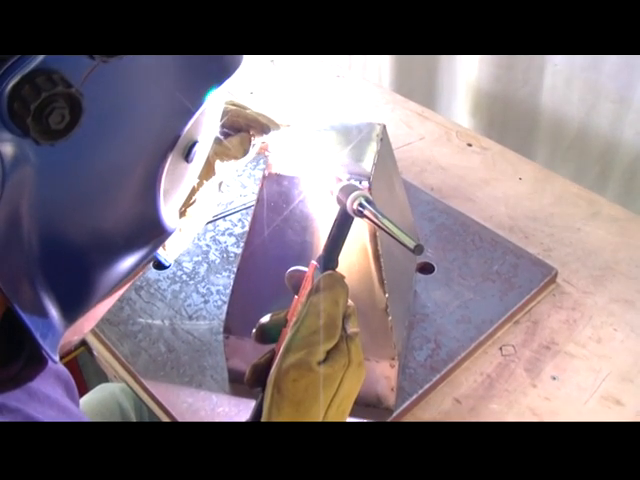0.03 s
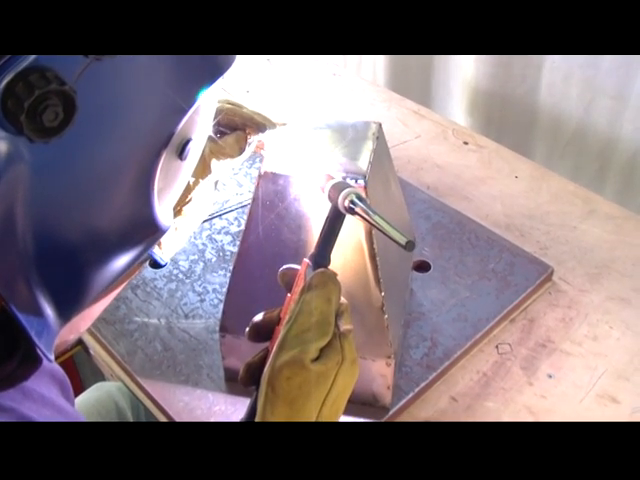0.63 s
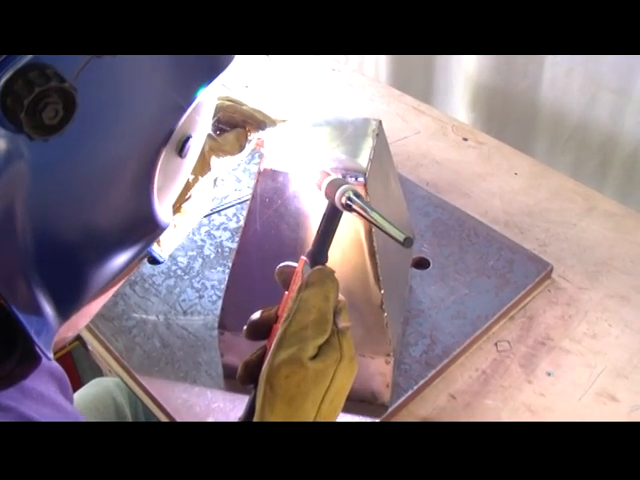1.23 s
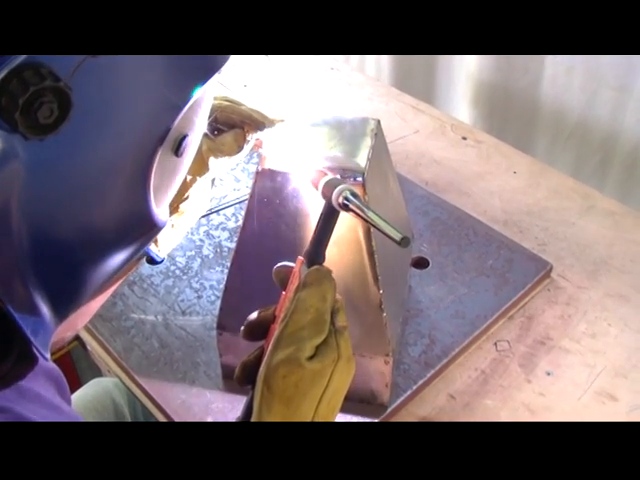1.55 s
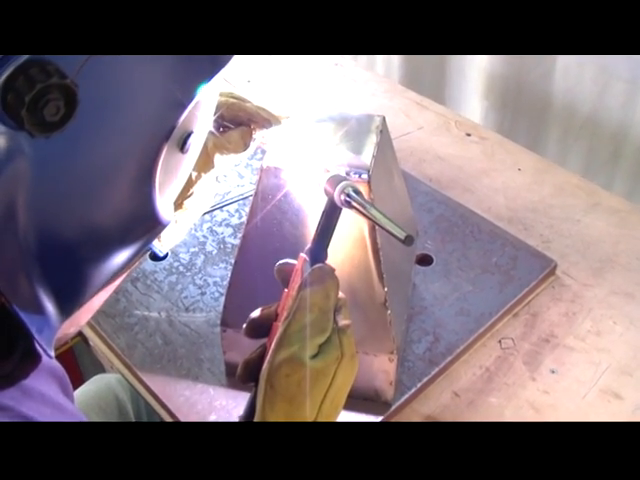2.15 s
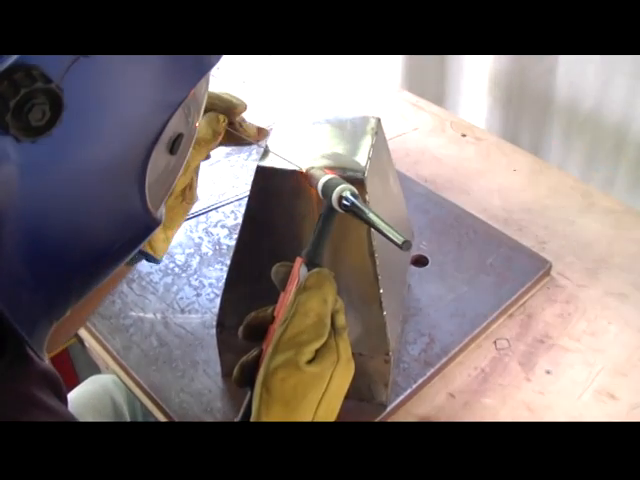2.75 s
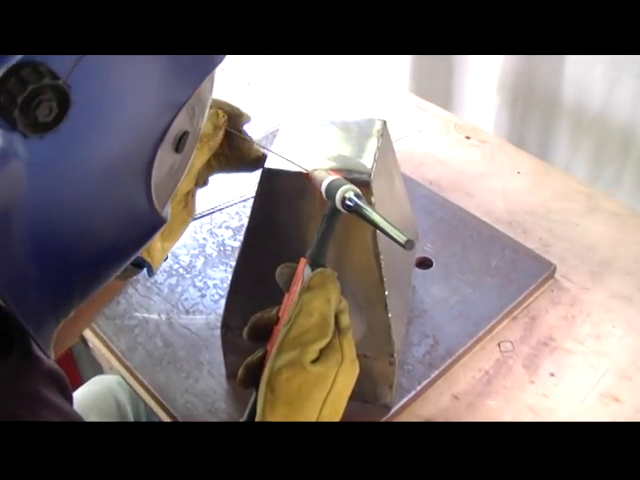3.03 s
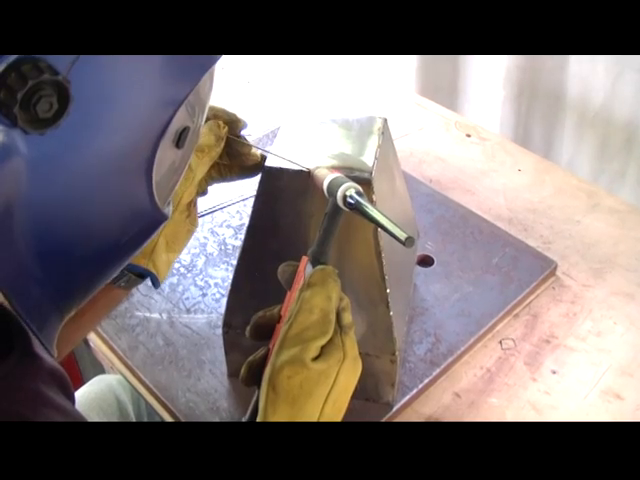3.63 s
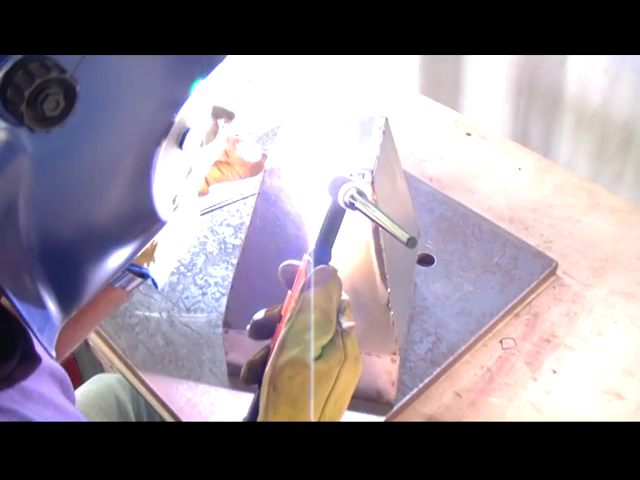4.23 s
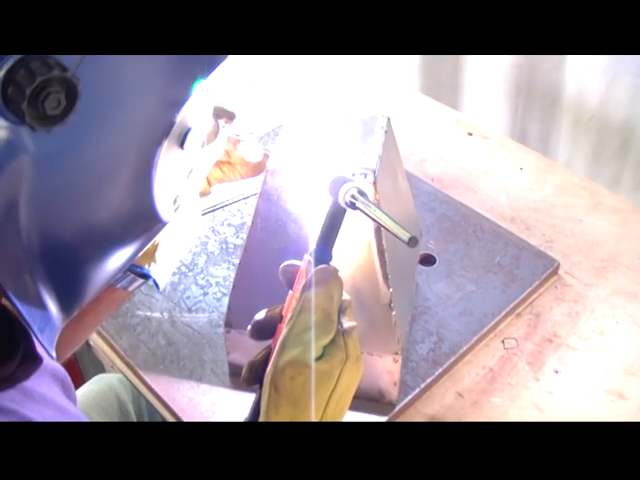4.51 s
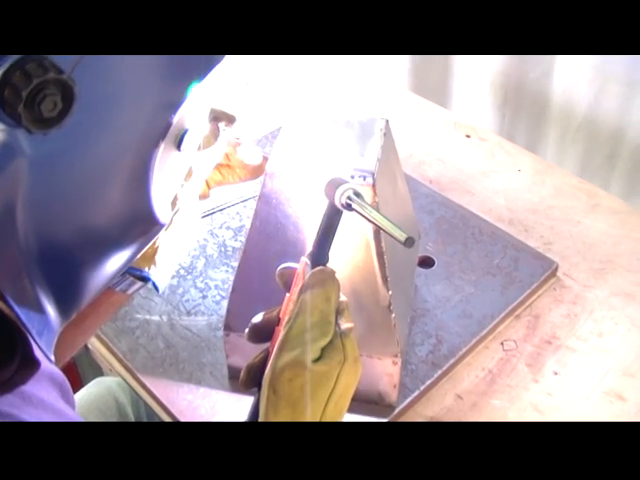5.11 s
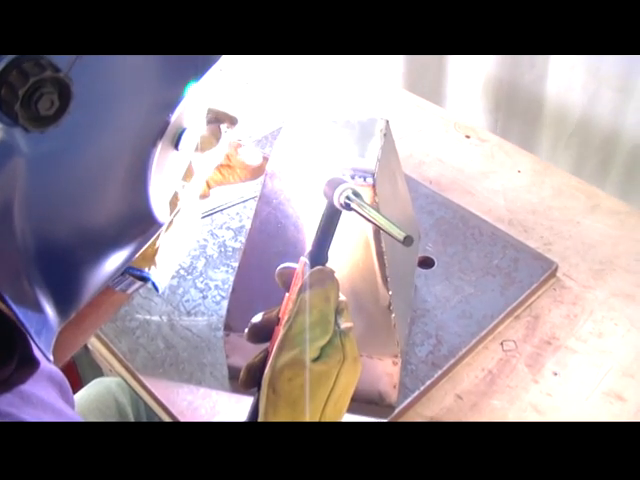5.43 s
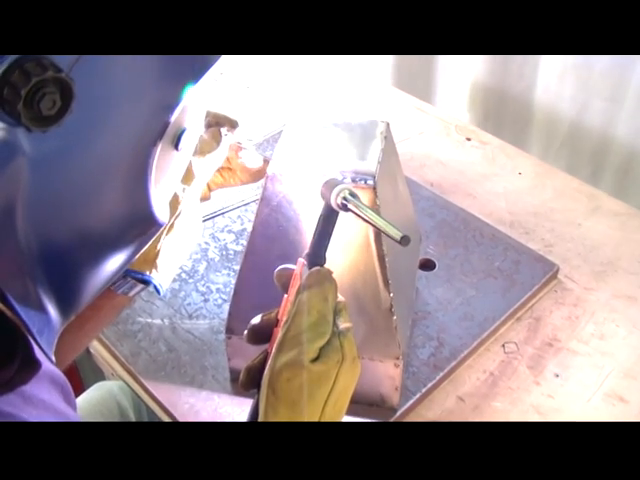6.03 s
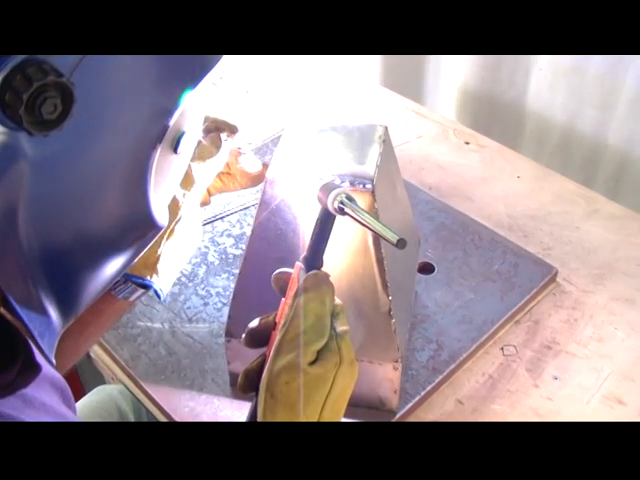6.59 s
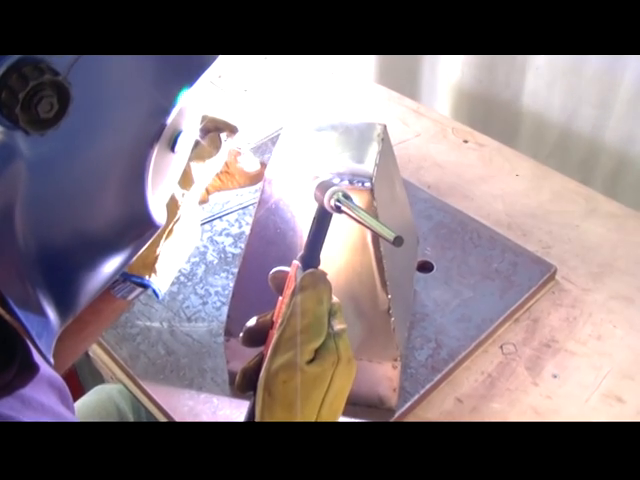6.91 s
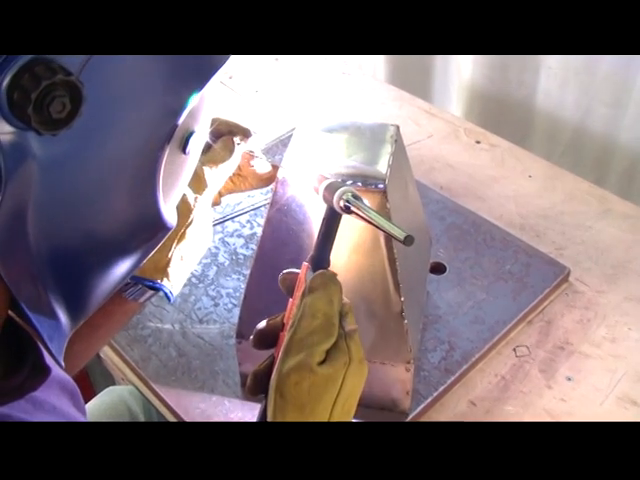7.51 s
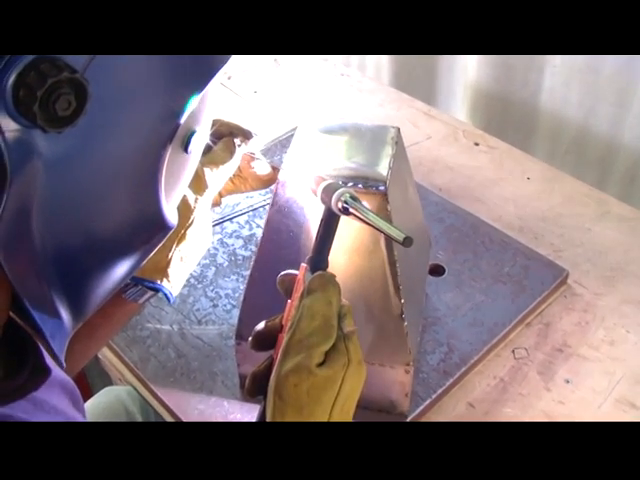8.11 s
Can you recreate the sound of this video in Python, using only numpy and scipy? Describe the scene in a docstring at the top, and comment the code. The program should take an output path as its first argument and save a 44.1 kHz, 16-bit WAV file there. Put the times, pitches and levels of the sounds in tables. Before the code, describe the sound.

Close by on a workshop bench, a welding arc hisses on a sheet-steel box, with a thin high whine, a faint buzz and occasional spits. It breaks off with a crack, leaving a soft rush of gas until a valve thuds shut. The torch switch clicks, the valve opens, and the arc strikes again with a sharp double crack, then sizzles on steadily. A cooling fan and a distant engine lie faintly underneath.

```python
"""On a workshop bench, a TIG arc pulsed 500 times a second hisses and whines on a sheet-steel box.
The melt spits now and then; a cooling fan and a distant engine lie underneath.
The arc breaks with a crack, shielding gas flows on for a second and its valve shuts.
The torch switch clicks, the valve opens, and the arc strikes again with a double crack."""
import sys
import numpy as np
from scipy import signal
from scipy.fft import rfft, irfft
from scipy.io import wavfile

SR = 44100
rng = np.random.default_rng(int(sys.argv[2]) if len(sys.argv) > 2 else 0)


def pcm_store(signal):
    """Save signal as 16-bit PCM."""
    levels = np.round(np.clip(np.atleast_2d(signal), -1, 1) * 32767)
    wavfile.write(sys.argv[1], SR, levels.astype(np.int16).T)


N = 368235
TIME = np.arange(N) / SR
ARC_OFF_S, ARC_ON_S, PULSE_HZ = 2.337, 3.828, 499.9


def from_db(db):
    """Amplitude ratio of a level in decibels."""
    return np.exp(np.log(10) / 20 * np.asarray(db))


def rms_one(x):
    """Normalisation to unit power."""
    return x / np.sqrt(np.mean(x ** 2) + 1e-20)


def in_time(curve):
    """Linear interpolation of (time_s, value) rows at every sample."""
    return np.interp(TIME, *np.transpose(curve))


def at_hz(spectrum, hz):
    """Interpolation of a spectrum on a log-frequency axis."""
    knots_hz, level_db = np.transpose(spectrum)
    return np.interp(np.log(np.maximum(hz, 1)), np.log(knots_hz), level_db)


def coloured(x, spectrum, size=8192):
    """Minimum-phase filtering: folding the cepstrum makes the response causal."""
    cepstrum = irfft(np.log(from_db(at_hz(spectrum, np.fft.rfftfreq(size, 1 / SR)))))
    cepstrum[1:size // 2] *= 2
    cepstrum[size // 2 + 1:] = 0
    response = irfft(np.exp(rfft(cepstrum)))[:size // 2]
    return signal.oaconvolve(x, response)[:N]


def noise(spectrum):
    """Spectrally shaped noise of unit power."""
    return rms_one(coloured(rng.standard_normal(N), spectrum))


def drift(rate_hz):
    """Slow random modulation of unit power."""
    knots = rng.standard_normal(4096)
    return rms_one(np.interp(TIME * rate_hz, np.arange(len(knots)), knots))


def dying(start_s, t60_s):
    """Exponential decay by 60 dB in t60_s."""
    return (TIME >= start_s) * from_db(np.maximum(-60 * np.abs(TIME - start_s) / t60_s, -300))


def resonating(modes, wander_db=0):
    """Forced resonance: turbulence keeps each mode ringing; its level may wander."""
    out = np.zeros(N)
    for hz, width_hz, level_db in modes:
        radius = np.exp(-np.pi * width_hz / SR)
        feedback = [1, -2 * radius * np.cos(2 * np.pi * hz / SR), radius ** 2]
        ring = signal.lfilter([1, 0, -1], feedback, rng.standard_normal(N))
        swell = from_db(wander_db * drift(1.35)) if wander_db else 1
        out += from_db(level_db) * rms_one(ring * swell)
    return out


def diffuse(x, t60_s):
    """Diffuse reverberation: convolution with a decaying noise tail of unit energy."""
    tail = rng.standard_normal(SR // 2) * dying(0.0016, t60_s)[:SR // 2]
    return signal.oaconvolve(x, tail / np.linalg.norm(tail))[:N]


def reflected(x):
    """Early reflections interfere with the direct sound."""
    # off bench, box and helmet: delay_s, gain
    echoes = [(0.002077, 0.12), (0.002794, -0.079), (0.003402, 0.15), (0.003584, 0.21), (0.003826, 0.18),
              (0.00472, 0.15), (0.007544, 0.13), (0.008976, 0.12), (0.0154, 0.13)]
    out = x.copy()
    for delay_s, gain in echoes:
        lag = round(delay_s * SR)
        out[lag:] += gain * x[:-lag]
    return out


def hollowed(x):
    """Resonant absorption: the hollow of the box swallows narrow bands."""
    # cavity modes: centre_hz, width_hz, depth_db
    hollows = [(447, 25, -11), (790, 15, 0), (1354, 44, -23), (1746, 59, -8), (2015, 64, -13),
               (2170, 25, -5), (2890, 36, -6), (3400, 130, -22), (3900, 58, -3), (9900, 220, -5)]
    for hz, width_hz, depth_db in hollows:
        band = signal.lfilter(*signal.iirpeak(hz, hz / width_hz, fs=SR), x)
        x = x + (from_db(depth_db) - 1) * band
    return x


def off_glove(x, delay_s=0.001082, sway_s=0.00007, gain=0.11):
    """Comb filtering: the echo off the glove shifts as the hand feeds the filler rod."""
    return x + gain * np.interp(TIME - delay_s - sway_s * drift(1.5), TIME, x, left=0)


def workshop(fan_db=-58, engine_db=-71, hum_db=-62, hum_hz=143):
    """Superposition of a cooling fan, a distant engine and a brief low hum."""
    # fan and background noise: frequency_hz, density_db
    fan_spectrum = [(25, -12), (36, -14), (50, 2.5), (75, -3.5), (100, -2), (160, -1), (230, 0.5),
                    (330, -1), (620, 0), (1000, -0.5), (1600, -10), (4000, -25.5), (8000, -22.5),
                    (16000, -25)]
    # fan tones: pitch_hz, width_hz, level_db
    fan_tones = [(631, 26, -68), (958, 29, -75), (3930, 90, -78)]
    # the engine speeds up and slows: time_s, pitch_hz
    engine_pitch = [(0, 49.5), (0.3, 50), (0.8, 64), (1.6, 80), (2.2, 90), (3.0, 58), (3.6, 48), (4.6, 53),
                    (6.6, 67), (7.6, 86), (8.35, 90)]
    fan = from_db(fan_db) * noise(fan_spectrum) + resonating(fan_tones)
    engine_phase = 2 * np.pi * np.cumsum(in_time(engine_pitch)) / SR
    engine = from_db(engine_db) * rms_one(np.sin(engine_phase))
    hum_swell = np.exp(-((TIME - 2.66) / 0.065) ** 2)
    hum = from_db(hum_db) * hum_swell * rms_one(np.sin(2 * np.pi * hum_hz * TIME))
    return fan + engine + hum


def gas():
    """Flow noise: shielding gas streams through the nozzle and excites its resonances."""
    # strength of the flow: time_s, level_db
    flow = [(0, -60), (2.4, -54.5), (3.0, -53), (3.37, -52), (3.42, -59), (3.48, -74), (3.73, -73),
            (3.745, -64), (3.80, -58.5), (8.35, -53)]
    # rush of the gas: frequency_hz, density_db
    rush_spectrum = [(200, -12), (500, -6), (1000, -28), (1800, -2.5), (2500, 1), (3300, 4.5), (4600, -3.5),
                     (5600, -5), (7000, -7.5), (8300, 2), (9400, 0), (10800, -4.5), (13300, -13),
                     (16000, -22)]
    # nozzle modes at full flow: pitch_hz, width_hz, level_db
    nozzle_modes = [(1480, 60, -69), (2440, 80, -58.5), (2605, 40, -63.5), (3200, 180, -71.5),
                    (3890, 110, -66), (4780, 190, -63.5), (9400, 600, -65), (11750, 380, -74),
                    (15330, 1100, -65)]
    flow_db = in_time(flow)
    rush = from_db(flow_db - 3.5) * noise(rush_spectrum)
    return rush + from_db(flow_db - flow_db.max()) * resonating(nozzle_modes)


def torch_switch(start_s=3.7, level_db=-44, t60_s=0.098):
    """Impact excitation: the torch switch clicks close by."""
    # switch body: frequency_hz, density_db
    body_spectrum = [(500, -15), (1400, 8), (2500, -3), (4000, -6), (6000, -14), (8100, 1), (10000, -11),
                     (14500, -7), (16000, -12)]
    return from_db(level_db) * noise(body_spectrum) * dying(start_s, t60_s)


def valve(thud_t60_s=0.24, spurt_t60_s=0.16, rise_s=0.0028):
    """Damped transients: the valve thuds across the room and lets out a spurt of gas."""
    # the valve shuts, then opens: start_s, thud_db, spurt_db
    strokes = [(3.355, -37.5, -66), (3.737, -39.5, -39.5)]
    # valve body: frequency_hz, density_db
    body_spectrum = [(200, -21), (400, -6), (630, 6), (900, -5), (1280, 2.5), (1800, -7), (2600, -14),
                     (5000, -35)]
    # escaping gas: frequency_hz, density_db
    spurt_spectrum = [(800, -9), (2400, -9), (5000, 0.5), (8000, -5), (12000, -6), (16000, -3.5)]
    out, thud, spurt = np.zeros(N), noise(body_spectrum), noise(spurt_spectrum)
    for start_s, thud_db, spurt_db in strokes:
        rise = np.clip((TIME - start_s) / rise_s, 0, 1)
        out += rise * from_db(thud_db) * thud * dying(start_s, thud_t60_s)
        out += rise * from_db(spurt_db) * spurt * dying(start_s, spurt_t60_s)
    return out


def burning():
    """Gate that is open while the arc is alight."""
    return (TIME < ARC_OFF_S) | (TIME > ARC_ON_S)


def spits(faint_per_s=25, faint_db=-33, fizz_db=-2, fizz_t60_s=0.033):
    """Shot noise: tiny bursts in the melt, a few sharp among many faint, each with a short fizz."""
    # sharp bursts: start_s, level_db
    snaps = [(0.3597, -19), (0.423, -24.5), (0.4342, -20), (0.5124, -17.5), (0.5508, -18), (0.5540, -18),
             (0.6039, -21), (0.8286, -16), (1.3455, -21.5), (1.8982, -13.5), (1.9319, -16), (1.9631, -17.5),
             (5.2592, -17.5), (6.0327, -23), (6.279, -16), (6.8232, -17.5), (7.1062, -24), (7.6788, -21)]
    # colour of a burst: frequency_hz, gain_db
    colour = [(60, -12), (300, 0), (900, 8), (2200, 14), (4500, 9), (9000, 12), (16000, 5)]
    onsets = burning() * (rng.random(N) < faint_per_s / SR)
    clicks = onsets * from_db(faint_db + np.minimum(rng.exponential(1, N), 3))
    for start_s, level_db in snaps:
        clicks[round(start_s * SR)] += from_db(level_db)
    return coloured(clicks + from_db(fizz_db) * diffuse(clicks, fizz_t60_s), colour)


def cracks(bench_delay_s=0.0036, low_cut_hz=486):
    """Monopole radiation: the plasma channel swells or collapses with a crackle; the steel rings on."""
    # two cracks at the break, two at the strike: start_s, swing_db, period_s, crackle_db, ring_db
    events = [(2.3362, -3.5, .00044, -23, -29), (2.33715, -9, .00080, -30, -38),
              (3.8271, 0, .00044, -16.5, -27), (3.8370, -2, .00040, -22, -30)]
    # crackle: frequency_hz, density_db
    crackle_spectrum = [(40, -48), (200, -43), (600, -25), (1200, -58), (2100, -25), (3200, -12), (4200, 2),
                        (7000, 19), (11000, 13.5), (16000, 13)]
    # broadband after-ring: frequency_hz, density_db
    ring_spectrum = [(40, -55), (150, -41), (500, -32), (1200, -12), (2200, 11), (3200, 6.5), (4500, 7),
                     (10000, -28), (16000, -13)]
    # free vibration of the steel: pitch_hz, relative_db, t60_s
    steel_modes = [(1050, -5, .11), (1997, -14, .13), (2160, -11, .16), (2428, -12, .18), (2697, -12, .18),
                   (3144, -9, .13), (3327, -12, .14), (4400, -14, .1)]
    out, crackle, ring = np.zeros(N), noise(crackle_spectrum), noise(ring_spectrum)
    for start_s, swing_db, period_s, crackle_db, ring_db in events:
        pressure_swing = np.sin(2 * np.pi * (TIME - start_s) / period_s) * dying(start_s, 6 * period_s)
        out += from_db(swing_db) * pressure_swing
        direct = dying(start_s + period_s / 2, t60_s=0.022)
        scattered = dying(start_s + bench_delay_s, t60_s=0.018)
        out += from_db(crackle_db) * crackle * (direct + scattered)
        out += from_db(ring_db) * ring * dying(start_s, t60_s=0.11)
        start, age = round(start_s * SR), TIME[:SR // 2]
        for hz, relative_db, t60_s in steel_modes:
            decay = from_db(ring_db + relative_db - 60 * age / t60_s)
            out[start:start + len(age)] += decay * np.sin(2 * np.pi * hz * age)
    # so small a source radiates little bass
    return signal.sosfilt(signal.butter(1, low_cut_hz, "high", fs=SR, output="sos"), out)


def whine(start_hz=15292, rise_hz_per_s=1.35, waver_depth=0.13):
    """Random amplitude and phase modulation makes a thin tone waver as it swells and fades."""
    # loudness, one curve for each weld: time_s, level_db
    swells = [
        [(0.0, -38), (0.25, -38), (0.42, -46), (0.85, -36.5), (1.2, -54.5), (1.6, -50), (1.82, -36),
         (2.32, -39.5)],
        [(3.88, -55), (3.98, -37), (4.15, -55), (5.05, -37), (5.5, -46), (5.98, -47), (6.35, -31), (6.5, -40),
         (7.55, -37.5), (7.88, -31), (8.05, -43), (8.35, -27)],
    ]
    phase = 2 * np.pi * np.cumsum(start_hz + rise_hz_per_s * TIME) / SR
    waver = 1 + waver_depth * (drift(60) + 1j * drift(60))
    tone = rms_one(np.real(waver * np.exp(1j * phase)))
    return from_db(in_time(np.vstack(swells)) + 0.5) * tone


def pulse_ticks(pattern_pulses=7, unevenness=0.15, smear_rad=0.82, harmonics=24):
    """Fourier series of the current pulses' ticks; a pattern seven pulses long adds sidebands."""
    # envelope of the harmonics: frequency_hz, level_db
    buzz = [(500, -70), (1500, -74), (2500, -60), (3000, -61), (3500, -66), (4500, -58), (6000, -57),
            (7000, -55), (7500, -52), (8500, -62), (10000, -64), (12000, -64), (16000, -74)]
    # lines between the harmonics: pitch_hz, level_db
    sidebands = [(2357, -61), (2857, -67), (3428, -61.5), (4356, -62), (4428, -59), (4856, -61),
                 (5356, -62), (6927, -57), (7427, -57), (7570, -59), (7856, -61), (8355, -53)]
    cycle = np.linspace(0, pattern_pulses, 8192)
    phases = smear_rad * rng.standard_normal(harmonics + 1)
    ticks = sum(from_db(at_hz(buzz, k * PULSE_HZ)) * np.cos(2 * np.pi * k * cycle + phases[k])
                for k in range(1, harmonics + 1))
    for hz, level_db in sidebands:
        multiple = round(pattern_pulses * hz / PULSE_HZ) / pattern_pulses
        ticks += from_db(level_db) * np.cos(2 * np.pi * multiple * cycle)
    pulses = PULSE_HZ * TIME
    strength = 1 + unevenness * rng.standard_normal(N)[np.round(pulses).astype(int)]
    return np.sqrt(2) * strength * np.interp(pulses % pattern_pulses, cycle, ticks)


def cup(vigour_db, treble_db):
    """Resonance between torch cup and steel: bands and whistles change as the torch travels."""
    # broad bands of the gap: centre_hz, width_hz, initial_db, change_db_per_s
    gap_modes = [(8250, 1100, -51, 1.15), (12200, 1400, -42.5, -.65)]
    # narrow whistles of the arc: pitch_hz, width_hz, initial_db, change_db_per_s
    whistle_modes = [(6499, 3.6, -48, -1.3), (8156, 7.6, -53, .5), (11877, 10, -47.5, -.5)]

    def singing(modes, wander_db):
        rings = (from_db(db_per_s * TIME) * resonating([mode], wander_db) for *mode, db_per_s in modes)
        return from_db(vigour_db) * sum(rings)

    # centre_hz, width_hz, level_db
    top_band, flare_band = (13556, 660, -49), (11950, 450, -41.5)
    top = from_db(4.5 * treble_db) * resonating([top_band])
    flare = np.exp(-((TIME - 2.13) / 0.22) ** 2) * resonating([flare_band])  # just before the break
    return singing(gap_modes, wander_db=-2) + top + flare, singing(whistle_modes, wander_db=-1.5)


def arc(roar_db=-47, hiss_db=-39.5, sizzle_db=-40.5, usual_vigour_db=-33, usual_treble_db=-41):
    """Amplitude modulation: plasma noise follows the arc's vigour and current; tones ride on it."""
    # vigour of the arc: time_s, level_db
    vigour = [(0.0, -32.5), (0.85, -32.5), (1.05, -33.5), (1.65, -33.5), (1.92, -30.5), (2.05, -32.5),
              (2.32, -31), (3.9, -33), (4.05, -34.5), (4.3, -33), (4.95, -33.5), (5.25, -31.5),
              (5.95, -33.0), (6.28, -30), (6.5, -32.5), (6.8, -32), (8.35, -34)]
    # strength of the top treble: time_s, level_db
    treble = [(0.0, -43), (0.8, -39), (1.1, -39), (2.32, -44), (3.9, -41), (5.05, -39), (5.25, -39),
              (5.95, -40), (6.25, -39.5), (6.85, -39), (7.2, -41), (8.35, -40.5)]
    # low, middle and high parts of the plasma noise: frequency_hz, density_db
    roar_spectrum = [(60, -22), (150, -9.5), (230, -7), (400, 1.5), (560, 0), (1050, -0.5), (1700, -4),
                     (2500, -8.5), (4000, -36), (8000, -36.5)]
    hiss_spectrum = [(500, -30), (1500, -6.5), (2500, -5.5), (3500, -8), (4600, -6), (5800, -3),
                     (7000, -1.5), (8300, -2), (9700, -1.5), (11500, -5), (16000, -20)]
    sizzle_spectrum = [(5000, -23), (9000, -13.5), (10700, 3), (11500, -1.5), (12300, -0.5), (13700, -2),
                       (15000, 2), (16400, -3)]
    # steel box modes at usual vigour: pitch_hz, width_hz, level_db
    box_modes = [(228, 18, -66), (345, 45, -67), (530, 70, -55.5), (872, 74, -59), (1020, 63, -58),
                 (1150, 75, -59), (1320, 40, -61.5), (1500, 80, -58), (1920, 80, -61), (2370, 160, -57),
                 (2800, 70, -64), (3420, 25, -61.5), (3640, 70, -65), (4440, 90, -63.5)]
    vigour_db = in_time(vigour) - usual_vigour_db
    treble_db = in_time(treble) - usual_treble_db
    flutter = from_db(0.5 * drift(45))
    throb = from_db(1.7 * np.cos(2 * np.pi * PULSE_HZ * TIME))
    grain = from_db(2.5 * np.minimum(rng.exponential(1, N), 6))
    roar = from_db(roar_db + 0.46 * vigour_db) * noise(roar_spectrum)
    pulsed_noise = rng.standard_normal(N) * throb * grain
    hiss = from_db(hiss_db + vigour_db) * rms_one(coloured(pulsed_noise, hiss_spectrum))
    sizzle = from_db(sizzle_db + 0.21 * treble_db) * noise(sizzle_spectrum)
    bands, whistles = cup(vigour_db, treble_db)
    ringing = from_db(0.83 * vigour_db) * (resonating(box_modes) + pulse_ticks())
    plasma = flutter * (roar + hiss + sizzle + bands)
    return burning() * plasma, burning() * (ringing + whistles + whine())


def scene(snap_room_db=-4, balance_db=-0.47, balance_db_per_s=0.05):
    """Interaural decorrelation: all sits almost straight ahead; scattered sound differs at each ear."""
    # bounce between the steel walls: frequency_hz, gain_db
    wall_colour = [(1500, -22), (3500, -12), (7000, -7.5), (16000, -7.5)]
    # room reverberation: frequency_hz, gain_db
    room_colour = [(100, -33.5), (500, -3.5), (2500, -8), (6000, -8), (10000, -13), (16000, -12)]
    # stereo width: frequency_hz, side_minus_mid_db
    width = [(50, -11), (125, -6.5), (250, -9.5), (500, -15), (1000, -16.5), (2000, -20.5), (4000, -14),
             (8000, -11.5), (12000, -14.5), (16000, -36)]
    plasma, tones = arc()
    plasma = off_glove(plasma)
    plasma = 0.93 * (plasma + coloured(diffuse(plasma, t60_s=0.06), wall_colour))
    steady = hollowed(reflected(plasma + gas()))
    snaps = reflected(spits() + cracks())
    room = coloured(diffuse(steady + from_db(snap_room_db) * snaps, t60_s=0.33), room_colour)
    mid = steady + snaps + room + tones + valve() + torch_switch() + workshop()
    side = coloured(diffuse(mid, t60_s=0.095), width)
    lean = from_db(0.5 * (balance_db + balance_db_per_s * TIME))  # shifts as the torch travels
    return np.array([(mid + side) * lean, (mid - side) / lean])


def record(dry, ceiling=0.52, cutoff_hz=16500):
    """Soft saturation rounds the cracks; a low-pass filter cuts the top."""
    low_pass = signal.ellip(12, 0.1, 70, cutoff_hz, fs=SR, output="sos")
    return signal.sosfilt(low_pass, ceiling * np.tanh(dry / ceiling))


dry = scene()
out = record(dry)
pcm_store(out)
```